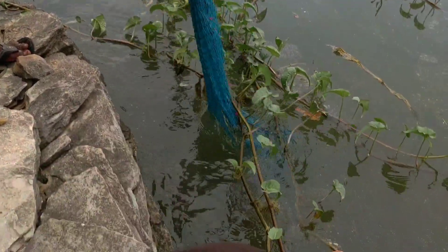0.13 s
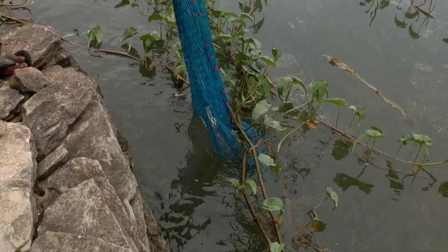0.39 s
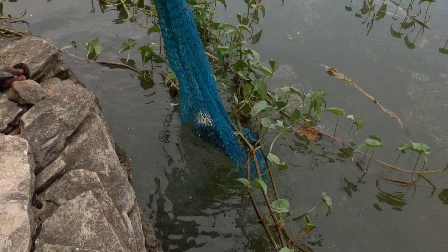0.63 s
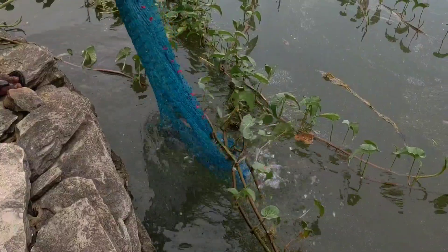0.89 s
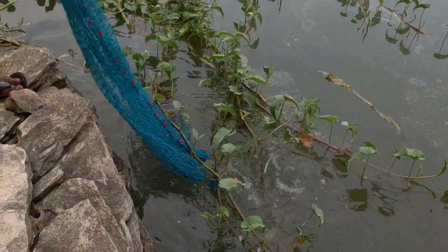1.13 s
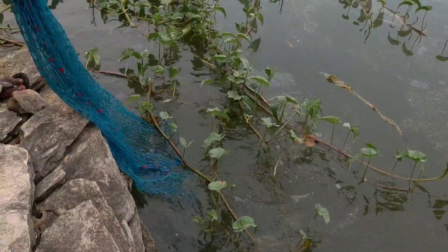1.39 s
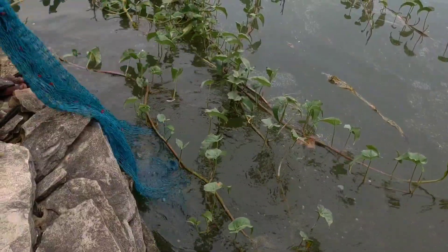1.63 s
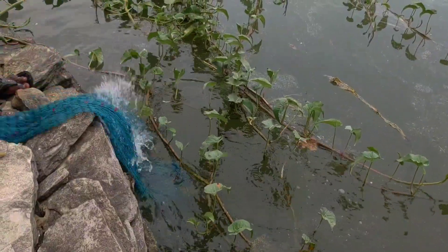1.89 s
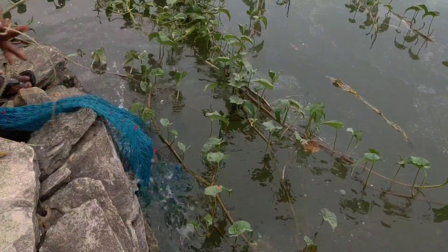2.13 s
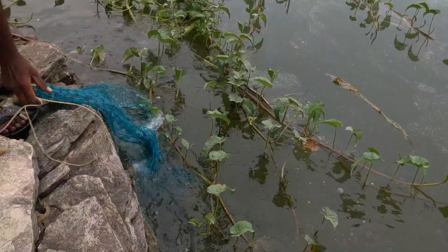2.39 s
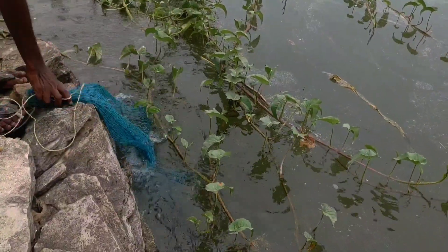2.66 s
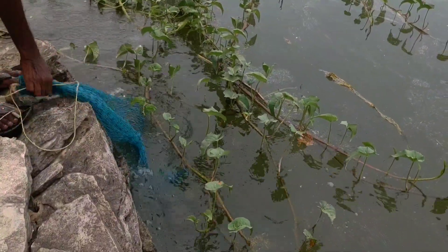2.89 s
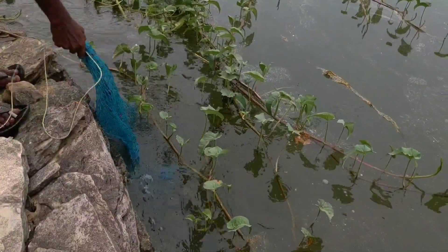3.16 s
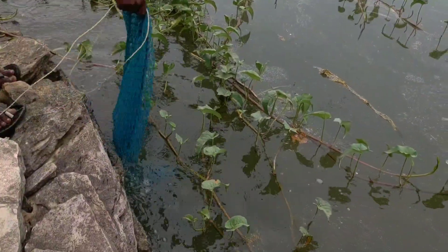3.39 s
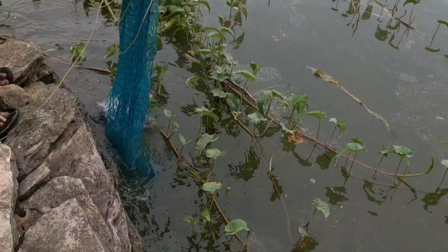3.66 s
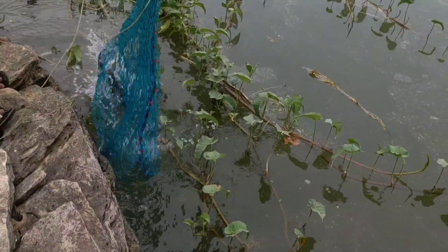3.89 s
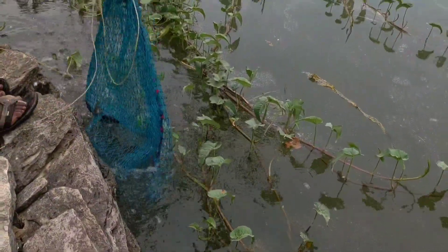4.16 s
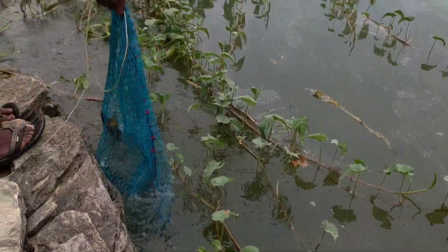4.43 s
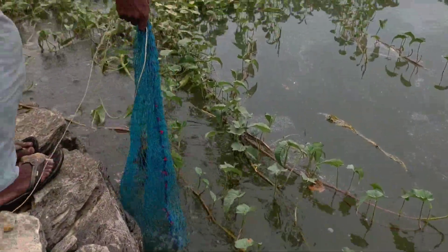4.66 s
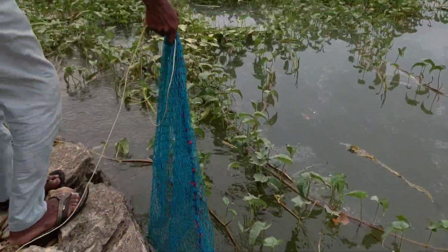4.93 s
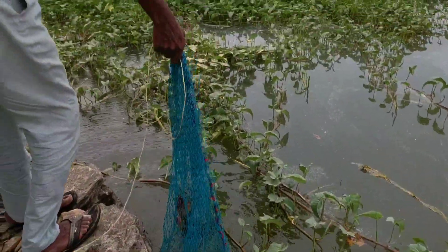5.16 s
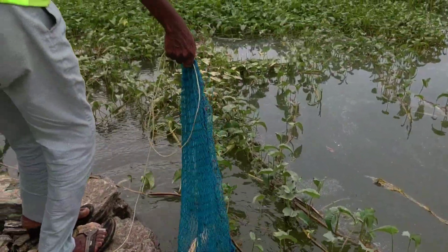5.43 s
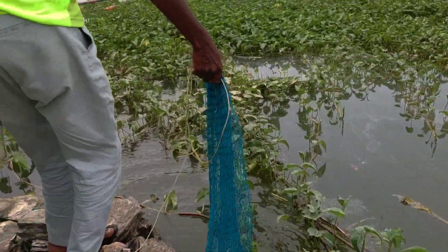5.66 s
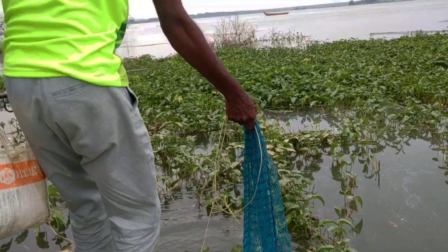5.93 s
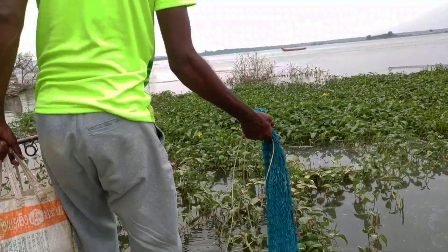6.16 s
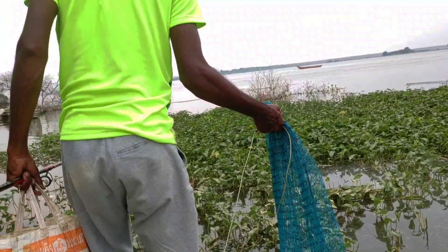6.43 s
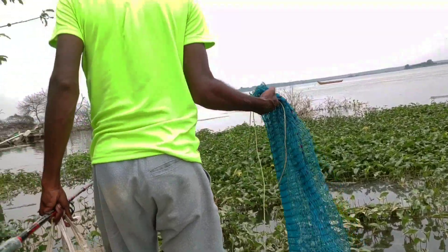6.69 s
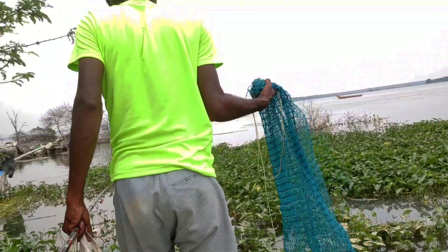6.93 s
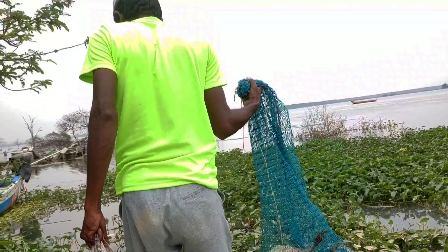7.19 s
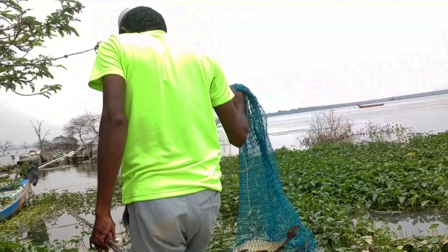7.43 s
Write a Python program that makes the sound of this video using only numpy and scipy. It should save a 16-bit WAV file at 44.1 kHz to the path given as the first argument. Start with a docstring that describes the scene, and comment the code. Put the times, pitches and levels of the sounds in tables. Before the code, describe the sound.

Three bubbly splashes as a wet mesh net is hauled from a river, then draining plops, droplet ticks, low wind buffeting and a soft thump.

```python
"""A wet mesh net is hauled out of a river beside rocks: three big splashes of bubbles and spray,
then drips, plops and droplet ticks as it drains. Showers of short damped sines over coloured noise
make the splashes and a low slosh; single damped sines with noise bursts make the plops and ticks.
Low noise buffets the two microphone ports; gliding sines make far bird chirps, a few bubble notes
and a low falling wind whistle."""
import sys
import numpy as np
from scipy import signal
from scipy.fft import rfft, irfft, next_fast_len
from scipy.io import wavfile
from scipy.ndimage import map_coordinates

SR = 44100
rng = np.random.default_rng(int(sys.argv[2]) if len(sys.argv) > 2 else 0)


def unload_audio(sound):
    """Save the sound as a 16-bit wav file, at the path given as the first command line argument."""
    columns = np.transpose(np.atleast_2d(sound))
    # keep every value between -1 and 1, then stretch to whole-number steps
    steps = np.round(np.clip(columns, -1, 1) * 32767)
    wavfile.write(sys.argv[1], SR, steps.astype(np.int16))


def nominal_scale(level):
    """Amplitude ratio for a level in decibels (scalar or array-like)."""
    x = np.asarray(level, float) / 20
    return 10 ** x


N = 333396

# colour of the low rush under the bubbles: f/Hz, level/dB
FROTH_COLOUR = [(120, -44), (200, -18.5), (327, -21.5), (436, -10), (1040, -5.5), (1410, -0.5), (1860, 4.5),
                (2410, -4.5), (3500, -19.5), (4550, -54), (7700, -120)]
# colour of the airborne droplets: f/Hz, level/dB
SPRAY_COLOUR = [(1470, -22), (2500, 1.5), (4580, -10), (5110, -5), (6650, -2), (7640, -12), (8880, -7),
                (10500, -19), (13600, -48), (22000, -120)]
# colour of the finest droplets: f/Hz, level/dB
FIZZ_COLOUR = [(6470, -34), (11000, -11.5), (12200, 5.5), (12900, 3), (15800, -5.5)]


def unit(x):
    """Scaled to rms 1."""
    return x / np.sqrt(np.mean(x ** 2) + 1e-20)


def along(points, hz):
    """(f/Hz, value) points read on a log frequency axis."""
    f, v = np.transpose(points)
    return np.interp(np.log(hz + 1), np.log(f + 1), v)


def curves(rows):
    """One value per sample for each column after the time."""
    s, *cols = np.transpose(rows)
    return [np.interp(np.arange(N) / SR, s, c) for c in cols]


def wobble(rate):
    """A smooth random curve, rate knots a second."""
    knots = rng.standard_normal(int(N * rate / SR) + 4)
    return map_coordinates(knots, [np.arange(N) * rate / SR])


def filtered(x, response):
    """x times a complex response of frequency."""
    m = next_fast_len(N + 8192)
    return irfft(rfft(x, m) * response(np.fft.rfftfreq(m, 1 / SR)), m)[..., :N]


def coloured(x, spectrum):
    """x through a (f/Hz, level/dB) spectrum, at rms 1."""
    return unit(filtered(x, lambda hz: nominal_scale(along(spectrum, hz))))


def sides(db):
    """Left and right gains for a left-right difference."""
    return nominal_scale(np.array([db / 2, -db / 2]))


def swells(s, db, rise_db_s, hold_s, sag_db_s, fall_db_s):
    """Summed power of events that build, hold while sagging, then die away, all straight in dB."""
    settings = (s, db, rise_db_s, hold_s, sag_db_s, fall_db_s)
    s, db, rise_db_s, hold_s, sag_db_s, fall_db_s = (np.reshape(v, (-1, 1)) for v in settings)
    knots = np.arange(0, N, 44) / SR
    u = knots - s
    build = rise_db_s * np.minimum(u, 0)
    sag = sag_db_s * np.clip(u, 0, hold_s)
    fall = fall_db_s * np.maximum(u - hold_s, 0)
    power = np.sum(nominal_scale(db + build - sag - fall) ** 2, axis=0)
    return np.interp(np.arange(N) / SR, knots, power)


def rings(s, db, hz, t60, rise, soft, size):
    """Damped sines, one per row; the pitch moves by a share of twice rise over each t60."""
    t = np.arange(size) / SR
    s, db, hz, t60 = (np.asarray(v)[:, None] for v in (s, db, hz, t60))
    turns = hz * t * (1 + rise * t / t60)
    onset = 1 - np.exp(-t * hz / soft)  # soft: time constant in cycles
    wave = nominal_scale(db - 60 * t / t60) * onset * np.sin(2 * np.pi * turns)
    at = np.round(s * SR).astype(int) + np.arange(size)
    return np.bincount(at.ravel(), wave.ravel(), N + SR)[:N]


def grains(centre_hz, octaves, cycles, spread_db, count, size):
    """Two unrelated showers of small bubbles at random times, pitches and sizes."""
    def shower():
        when, pitch, big = rng.random(count), rng.standard_normal(count), rng.exponential(size=count)
        hz = np.clip(centre_hz * 2 ** (octaves * pitch), 150, 15500)
        db = spread_db * np.minimum(big, 3.6)  # no drop is huge
        db = db - db.mean()
        return rings(when * N / SR, db, hz, cycles / hz, rise=0.32, soft=0.24, size=size)
    return unit(np.array([shower(), shower()]))


def ports(pair):
    """Adds the second of the pair to the left and takes it from the right, then delays and shades each port."""
    # likeness of the two ports: f/Hz, correlation/0-1
    alike = [(250, .98), (1000, .93), (3000, .68), (15000, .68)]
    # phase by which the left leads: f/Hz, lead/rad
    lead = [(100, 0), (1000, .4), (2000, 1.65), (3000, 3.5), (4000, 7.5), (5800, 12), (16000, 12.6)]
    # shading between the ports: f/Hz, left over right/dB
    tilt = [(60, 2), (110, -5.5), (200, 1), (380, -0.5), (700, 0), (1290, -6.5), (2380, 0), (4400, -10),
            (8120, 1), (15000, -11.5)]

    def turn(hz):
        return np.arccos(np.clip(along(alike, hz), 0, 1)) / 2

    def skew(hz):
        return sides(along(tilt, hz)) * np.exp(.5j * along(lead, hz) * [[1], [-1]])
    mid, side = filtered(pair, lambda hz: [np.cos(turn(hz)), np.sin(turn(hz))])
    return filtered(np.array([mid + side, mid - side]), skew)


def hiss():
    """Far water and the microphone's own noise: a gently wavering noise bed, partly shared by the ports."""
    # colour of the bed: f/Hz, level/dB
    hiss_colour = [(290, -31.5), (500, -1), (603, -3.5), (3130, -11.5), (4430, -13), (6540, -15.5),
                   (10700, -23), (12500, -9), (15800, -9)]
    own, shared = rng.standard_normal((2, N)), rng.standard_normal(N)
    level_db = -71.5 + 0.96 * wobble(2.4)
    return nominal_scale(level_db) * coloured(own + 1.3 * shared, hiss_colour)


def gliding_tones():
    """Far bird chirps, a few bubble notes and a low falling wind whistle: soft-edged sines, echoing."""
    # faint gliding tones, the high ones likely far birds:
    # t/s, length/s, first f/Hz, last f/Hz, level before flutter, echo and trim/dB
    glides = [(1.25, .085, 5360, 4580, -66), (1.387, 0.034, 5000, 4730, -60.5),
              (1.408, 0.022, 6840, 4900, -52), (1.415, 0.033, 3200, 2370, -64),
              (1.548, 0.062, 3130, 3360, -62), (1.612, 0.046, 3330, 2400, -66.5),
              (1.416, 0.043, 784, 860, -54), (1.718, 0.034, 4870, 4800, -70),
              (1.75, 0.019, 6600, 4630, -60), (4.754, 0.011, 1360, 2620, -52), (6.11, .14, 3110, 3130, -70),
              (6.145, 0.045, 1720, 1790, -65), (6.295, 0.07, 794, 750, -72),
              (6.297, 0.063, 3150, 2900, -72), (6.395, 0.013, 2860, 2950, -62.5),
              (6.405, 0.01, 2520, 2330, -57), (6.435, 0.037, 1770, 1670, -66),
              (6.445, 0.013, 2800, 3020, -59.5), (6.559, 0.23, 475, 329.5, -62)]
    tones, waver = np.zeros(N), 1 + .022 * wobble(120)  # unsteady pitch
    for s, length, first_hz, last_hz, db in glides:
        start = round(s * SR)
        hz = np.linspace(first_hz, last_hz, round(length * SR))
        hz = hz * waver[start:][:len(hz)]
        tone = np.sin(2 * np.pi * np.cumsum(hz) / SR)
        tones[start:][:len(hz)] += nominal_scale(db) * np.hanning(len(hz)) ** .5 * tone
    t = np.arange(SR // 10) / SR
    banks = rng.standard_normal(len(t)) * nominal_scale(-60 * t / .12)  # scattered back by banks and reeds
    echo = signal.fftconvolve(tones, banks / np.linalg.norm(banks))[:N]
    return nominal_scale(-3) * (tones * nominal_scale(3 * wobble(90)) + echo)


def low_slosh():
    """Deep body of splashes and plops, and wavelets between them: big slow bubbles over a dull wash."""
    # colour of the wash: f/Hz, level/dB
    wash_colour = [(110, -36), (180, -12), (215, 1.5), (355, 1), (453, -10.5), (600, -36.5), (780, -70),
                   (1320, -120)]
    # swells of low water, from splashes, plops and wavelets:
    # t/s, level before the trim below/dB, build/(dB/s), hold/s, ebb/(dB/s)
    slosh_swells = [(0.01, -61.5, 100, 0.39, 200), (1.786, -65.5, 42, .01, 100),
                    (1.884, -31.5, 288, 0.0044, 67), (2.21, -36, 128, .05, 146),
                    (2.303, -49.5, 99.5, 0.21, 300), (3.605, -62.5, 46, 0.41, 36),
                    (4.995, -55.5, 29.5, 0.16, 25), (5.833, -49, 601.5, 0.0062, 404),
                    (6.069, -53.5, 351.5, .005, 257), (6.465, -60.5, 143.5, 0.23, 11),
                    (7.204, -46.5, 156.5, 0.0031, 92)]
    calm_db = -83  # slosh between swells, before the trim
    glugs = grains(centre_hz=350, octaves=0.2574, cycles=31, spread_db=3.0, count=900, size=4000)
    wash = coloured(rng.standard_normal((2, N)), wash_colour)
    s, db, rise, hold_s, fall = np.transpose(slosh_swells)
    slosh = np.sqrt(swells(s, db, rise, hold_s, 0, fall) + nominal_scale(calm_db) ** 2)
    trim = nominal_scale(-4.5 + 1.3 * wobble(6.5))
    return slosh * trim * unit(glugs + nominal_scale(-0.5) * wash)


def wind():
    """Lumpy low pressure, mostly shared by the ports, with its own lumps and gusts at each."""
    # colour of the buffeting: f/Hz, level/dB
    buffet_colour = [(13, -38.5), (22, -12.5), (38, 7.5), (59, 8), (90, 4), (166, -6.5), (250, -18),
                     (320, -23), (550, -120)]
    # slowly changing breeze at both ports: t/s, level/dB
    breeze_levels = [(0, -70), (0.5, -63), (1.4, -51.5), (1.7, -63), (2.5, -61), (3.1, -60.5), (3.55, -69),
                     (3.95, -55), (5.5, -57), (5.9, -66), (6.8, -66.5), (7.55, -67)]
    # gusts and hands rubbing near one port:
    # t/s, level/dB, left over right/dB, build/(dB/s), fall/(dB/s)
    gust_events = [(0.29, -45, 1.5, 80, 42), (0.69, -54.5, 4, 98, 52), (2.74, -49.5, 9, 121.5, 170),
                   (5.32, -55, 7.5, 49, 38.5), (6.069, -46, 12.5, 224.5, 902), (6.881, -53, -1, 178.5, 57),
                   (7.153, -40.5, 31, 280, 146), (7.21, -40.5, 31, 300, 200), (7.34, -38.5, 14, 71, 317),
                   (7.42, -46.5, 2, 200, 57)]
    own, shared = rng.standard_normal((2, N)), rng.standard_normal(N)
    lumps = nominal_scale(3.4 * np.array([wobble(33), wobble(29)]))
    s, db, lean_db, rise, fall = np.transpose(gust_events)
    gusts = np.array([swells(s, db + side * lean_db / 2, rise, 0, 0, fall) for side in (1, -1)])
    breeze = nominal_scale(curves(breeze_levels)[0] + 0.84 * np.array([wobble(12), wobble(9)]))
    buffeting = unit(lumps * coloured(own + 1.7 * shared, buffet_colour))
    return np.sqrt(gusts + breeze ** 2) * buffeting


def thump():
    """A hand bumps the left port: a single push of air with a rebound on either side."""
    # the bump: t/s, peak level/dB, width/s
    bump = (6.043, -24, 0.0032)
    s, db, width = bump
    u = ((np.arange(N) / SR - s) / width) ** 2
    push = nominal_scale(db) * (u - 1) * np.exp(-u / 2)
    return np.outer([1, 0], push)  # left only


def pouring():
    """Gains of froth, spray and fizz: every load of water on top of the background spray."""
    # loads of water leaving the net:
    # t/s, bubbling level/dB, pour/s, spray over bubbling/dB, fall/(dB/s)
    surges = [(0.675, -44.5, 0.07, -8.5, 200), (0.71, -33, 0.036, -9, 143.5), (0.8, -43.5, .19, -9.5, 300),
              (1.822, -39.5, .04, -10.5, 199), (1.877, -28, 0.058, -6.5, 153.5),
              (2.0, -42.5, 0.16, -7.5, 80), (2.164, -35, .1, -9, 98.5), (2.33, -43.5, .18, -9, 149.5),
              (2.498, -50.5, 0.0035, 6.5, 174.5), (2.62, -61.5, .28, -1, 500),
              (3.038, -54.5, 0.0064, -16, 501), (3.677, -40.5, 0.57, -3, 156), (3.97, -54, 0.0058, 3.5, 75),
              (4.34, -59.5, .7, 0.5, 62), (5.238, -56, 0.0052, -4, 260), (5.358, -66, 0.0039, 9.5, 96),
              (5.827, -51, 0.011, -16, 1001.5), (6.037, -59.5, 0.068, 5.5, 700), (6.85, -63, .25, -9, 20)]
    # background spray under and between the loads, and how fine it is:
    # t/s, spray level/dB, fizz over spray/dB
    background = [(0, -75, -1), (0.6, -77.5, -3), (0.72, -46.5, -12), (1.1, -61.5, -3.5), (1.7, -78, 5),
                  (1.85, -70, -11), (2.9, -68, -7), (3.1, -79.5, 6), (3.65, -81, -11), (4.5, -68.5, -6),
                  (5.5, -66, -6), (5.75, -91, 5), (5.84, -91, 2), (6.05, -68.5, -1.5), (6.2, -76.5, 8.5),
                  (6.8, -73.5, 2), (7.26, -67.5, -5.5), (7.55, -65.5, -6)]
    rise_db_s, sag_db_s = 1001, 8.5  # onset, thinning while it pours
    spray_late_s = 0.0046  # the spray flies a moment after the froth begins
    mist_lingers = 0.93  # spray's rate of fall over the froth's
    background_froth_db = -8.5  # bubbling of the background over its spray
    s, db, pour_s, spray_db, fall = np.transpose(surges)
    background_db, fine_db = curves(background)
    froth = swells(s, db, rise_db_s, pour_s, sag_db_s, fall)
    froth = froth + nominal_scale(background_db + background_froth_db) ** 2
    spray = swells(s + spray_late_s, db + spray_db, rise_db_s, pour_s, sag_db_s, mist_lingers * fall)
    spray = spray + nominal_scale(background_db) ** 2
    return np.sqrt(froth), np.sqrt(spray), np.sqrt(spray) * nominal_scale(fine_db)


def patter():
    """Stray drops at random moments, each a short broad snap with some body under it."""
    per_s, level_db, spread_db, t60_s = 35, -2, 3.5, 0.026  # level relative to the spray gain
    sizes_db = spread_db * np.minimum(rng.exponential(size=N), 2.5)
    hits = (rng.random(N) < per_s / SR) * nominal_scale(sizes_db)
    snaps = signal.lfilter([1], [1, -nominal_scale(-60 / (t60_s * SR))], hits)
    noise = rng.standard_normal((2, N))
    broad = coloured(noise, SPRAY_COLOUR) + nominal_scale(-1) * coloured(noise, FROTH_COLOUR)
    return pouring()[1] * nominal_scale(level_db) * snaps * broad


def ticks():
    """A droplet bursts: a few cycles at its own pitch and a broad snap, brightest for the smallest drops."""
    # droplets striking water, mesh and stone: t/s, nominal level/dB, f/Hz
    droplets = [(0.853, -26, 4670), (0.945, -29, 3580), (0.9789, -30, 3440), (1.006, -30.5, 5040),
                (1.57, -46.5, 4120), (1.8962, -19.5, 5100), (2.2795, -28, 2970), (2.3172, -25, 6400),
                (2.4416, -31.5, 6460), (2.4656, -26.5, 6230), (2.5516, -32.5, 6300), (2.6192, -37.5, 7040),
                (2.6747, -31, 6550), (3.0552, -45, 2970), (4.1523, -22, 6700), (4.3417, -38, 6700),
                (4.3772, -36.5, 6550), (4.4136, -29, 6800), (4.4794, -39.5, 6580), (4.539, -20.5, 6400),
                (4.6403, -17.5, 5120), (4.7698, -38, 3960), (4.8281, -40.5, 6460), (4.889, -43, 6550),
                (5.0218, -43, 5030), (5.0945, -44, 6520), (5.228, -35.5, 9000), (5.321, -33.5, 4530),
                (5.3536, -29, 6600), (5.363, -32.5, 6760), (5.4388, -43, 4700), (5.4609, -40, 5280),
                (5.485, -44.5, 4400), (6.2934, -38, 12900), (6.473, -41.5, 6800), (6.5193, -42, 3060),
                (6.567, -43.5, 6480), (6.695, -40, 13500), (6.7623, -50, 2400), (6.8515, -43, 2450),
                (7.1838, -39.5, 2410), (7.295, -42, 12900), (7.3438, -37.5, 6330), (7.4774, -26, 13500),
                (7.4788, -33, 7100)]
    s, db, hz = np.transpose(droplets)
    t = np.arange(1500) / SR
    snaps = np.zeros((2, N + len(t)))  # ordinary drops, finest drops
    for start, level, fine in zip(s, db, hz > 11000):
        snap = nominal_scale(level - 13.5 - 60 * t / 0.033) * (1 - np.exp(-t / 0.00099))
        snaps[int(fine), round(start * SR):][:len(t)] += snap
    noise = rng.standard_normal(N)
    spray, fizz = coloured(noise, SPRAY_COLOUR), coloured(noise, FIZZ_COLOUR)
    broad = snaps[0, :N] * (spray + nominal_scale(-8.0) * fizz) + snaps[1, :N] * nominal_scale(3.0) * fizz
    return broad + rings(s, db + 4.5, hz, 22 / hz, rise=0.036, soft=0.79, size=400)


def plops():
    """A drop enters with a crack and a rough splat, a few small bubbles, and one main bubble whose note rises."""
    # single bubbles closing in the water: t/s, nominal level/dB, f/Hz, splat over bubble/dB
    bubbles = [(0.663, -36, 1610, -10), (0.678, -28, 1630, 2), (0.692, -26, 1720, -13),
               (0.709, -14, 880, -5.5), (0.741, -19.5, 498, -10), (0.944, -41, 640, -6),
               (0.98, -29.5, 1770, 2), (1.062, -42, 1360, -4), (1.09, -41, 1944, -17),
               (1.15, -45, 2250, -20), (1.21, -52, 2070, -11), (1.414, -40, 803, -9.5),
               (1.455, -51, 1810, -11), (1.456, -46, 3270, -10), (1.5, -54, 1710, -12),
               (1.542, -47.5, 341, -3.5), (1.577, -47, 640, -11), (1.607, -35, 1180, -15),
               (1.809, -14, 740, -12), (1.826, -20.5, 1770, -6), (1.875, -18, 1170, 1),
               (1.932, -5.5, 990, -10.5), (1.974, -10.5, 754, -10), (2.205, -28.5, 223, -15),
               (2.231, -17, 312, -1), (2.562, -33, 1785, -6), (2.601, -50, 920, 2), (2.741, -44, 1054, -4),
               (2.78, -35.5, 1890, -5), (2.805, -46, 1510, -5), (2.848, -33, 1870, 0),
               (2.873, -42, 1840, 0.5), (2.996, -47.5, 860, 3.5), (3.017, -43.5, 1540, -6),
               (3.031, -46, 1850, 3.5), (3.043, -47, 725, -1), (3.285, -53.5, 640, -5),
               (3.405, -58, 780, -15), (3.674, -22.5, 1920, -13), (3.701, -12, 1080, -6.5),
               (3.744, -22, 646, -29), (3.757, -16.5, 1084, -3.5), (3.837, -18, 1900, -6),
               (3.951, -20, 1187, -5.5), (3.991, -24.5, 1810, -14), (4.058, -27.5, 1020, 2),
               (4.137, -32, 1550, 12.5), (4.194, -31.5, 350, 1), (4.257, -31, 830, -1),
               (4.363, -38.5, 1740, -22), (4.408, -36, 547, 0.5), (4.455, -44, 1030, 3.5),
               (4.466, -46, 2144, -13), (4.592, -36, 289, -2), (4.626, -20, 1370, -9),
               (4.636, -23, 2030, -22), (4.64, -36, 370, -8), (4.72, -45, 2050, -14),
               (4.742, -39, 616, -26), (4.742, -27.5, 1143, -8.5), (4.828, -34.5, 1930, -10.5),
               (4.867, -48, 696, 4.5), (4.936, -41.5, 296, 1.5), (5.004, -44, 1640, 6.5),
               (5.17, -38, 495, -5.5), (5.398, -40.5, 1870, -15.5), (5.416, -29, 1067, -10.5),
               (5.45, -39, 1720, -11), (5.832, -35.5, 1200, 3), (6.237, -62, 1080, 7),
               (6.48, -57, 1700, 4.5), (6.52, -52.5, 1760, 13.5), (6.573, -46.5, 1530, 4.5),
               (6.59, -46, 1690, -7), (6.731, -46.5, 1650, 6), (6.763, -36.5, 358, 0),
               (6.76, -35.5, 1163, -3), (6.852, -50, 408, 4.5), (7.182, -41, 1170, 10.5),
               (7.197, -20, 1064, -4), (7.205, -19, 1024, -9.5), (7.294, -27, 385, -5),
               (7.316, -23, 1036, -11.5), (7.334, -37, 1530, -11), (7.406, -41, 985, -1.5)]
    s, db, hz, splat_db = np.transpose(bubbles)
    # t60 of a 1 kHz bubble at -30 dB with a 0 dB splat; bigger ones ring longer
    ring_s, ring_pitch_power = 0.027, 0.42
    # loud or splashy entries break sooner
    ring_db_per_db, ring_db_per_splat_db = 0.315, 0.2343
    shortening_db = ring_db_per_db * (db + 30) + ring_db_per_splat_db * splat_db
    t60 = ring_s * (1000 / hz) ** ring_pitch_power * nominal_scale(-shortening_db)
    climb = .15 * (1000 / hz[:, None]) ** 0.55  # bigger bubbles climb more
    main = rings(s, db, hz, t60, rise=climb, soft=0.97, size=4000)

    late, pitch, size = np.moveaxis(rng.random((len(s), 5, 3)), 2, 0)  # five small bubbles each
    small_s = (s[:, None] + .028 * late).ravel()
    small_hz = (hz[:, None] * 2 ** (2.2 * pitch - .8)).ravel()
    small_db = ((db + splat_db)[:, None] - 9 * size).ravel()
    small = rings(small_s, small_db, small_hz, 12 / small_hz, rise=0.31, soft=0.62, size=1200)

    # the surface breaks
    crack = rings(s, db + splat_db + 2, 1800 + 0 * s, .004 + 0 * s, rise=-0.25, soft=.3, size=300)
    t = np.arange(3000) / SR
    splats = np.zeros(N + len(t))
    for start, level in zip(s, db + splat_db):
        splats[round(start * SR):][:len(t)] += nominal_scale(level - 7.0 - 60 * t / 0.044)
    splat = splats[:N] * coloured(rng.standard_normal(N), FROTH_COLOUR)
    return main + small + splat + crack


def splash():
    """Froth of ringing bubbles over a rush; spray of short droplets over hiss; the finest fizz on top."""
    froth_gain, spray_gain, fizz_gain = pouring()
    bubbles = grains(centre_hz=1307, octaves=0.5875, cycles=30.0, spread_db=2.5, count=4000, size=900)
    drips = grains(centre_hz=1550, octaves=0.457, cycles=33, spread_db=3.5, count=800, size=1800)
    rush = coloured(rng.standard_normal((2, N)), FROTH_COLOUR)
    water = unit(bubbles + nominal_scale(-3) * rush + nominal_scale(-3) * drips)
    drops = grains(centre_hz=5810, octaves=1.0, cycles=24, spread_db=6.0, count=6000, size=160)
    mist = coloured(drops + nominal_scale(6.5) * rng.standard_normal((2, N)), SPRAY_COLOUR)
    pricks = grains(centre_hz=13500, octaves=0.13, cycles=24, spread_db=8.5, count=2500, size=90)
    fine = coloured(pricks + nominal_scale(3.0) * rng.standard_normal((2, N)), FIZZ_COLOUR)
    surge = wobble(30)  # slops of water arrive in clumps that froth and spray together
    froth = froth_gain * nominal_scale(1.3 * surge + 2.05 * wobble(14)) * water
    spray = spray_gain * nominal_scale(1.1 * surge + 2.1 * wobble(50)) * mist
    fizz = fizz_gain * nominal_scale(1.5 * surge + 2.2 * wobble(30)) * fine
    return froth + spray + fizz


def scene():
    """All water reaches both ports; each single drop has a short echo, opposite in sign between them."""
    drops = plops() + ticks()
    echo = np.roll(drops, 170)  # about 4 ms later, off the rocks
    water = splash() + patter() + low_slosh() + [drops, echo]
    return ports(water) + wind() + thump() + gliding_tones() + hiss()


def top_cut(x):
    """Nothing passes above the cut-off."""
    return signal.sosfilt(signal.butter(12, 16990, fs=SR, output="sos"), x)


def record(dry):
    """The camera's band limit: everything above top_hz drops by 30 dB."""
    top_hz = 15900
    mix = filtered(dry, lambda hz: nominal_scale(-30 * (hz > top_hz)))
    return top_cut(mix)


dry = scene()
out = record(dry)
unload_audio(out)
```